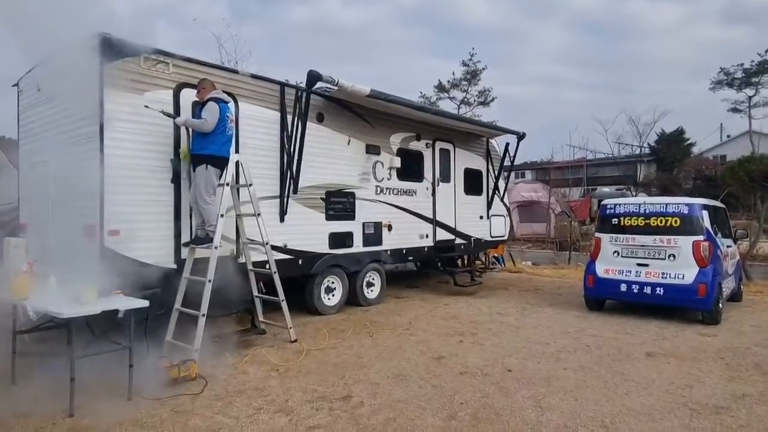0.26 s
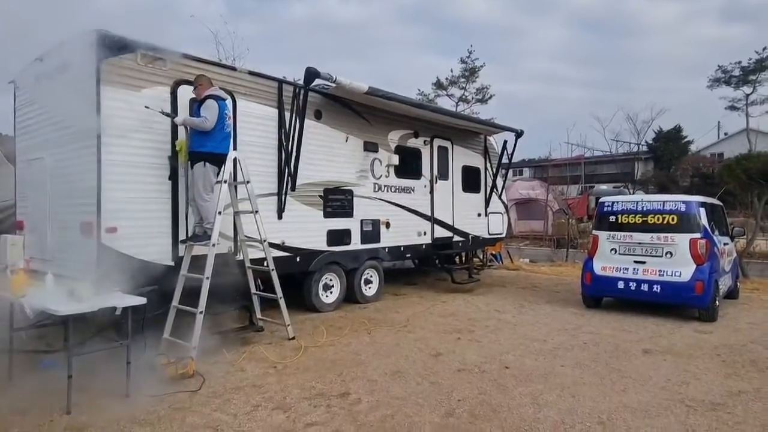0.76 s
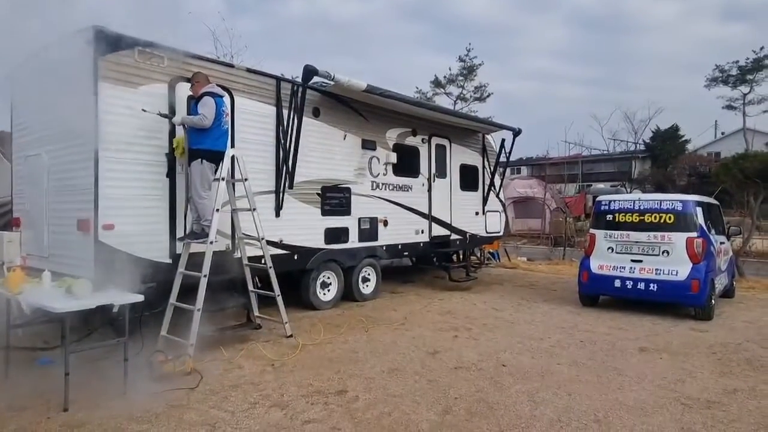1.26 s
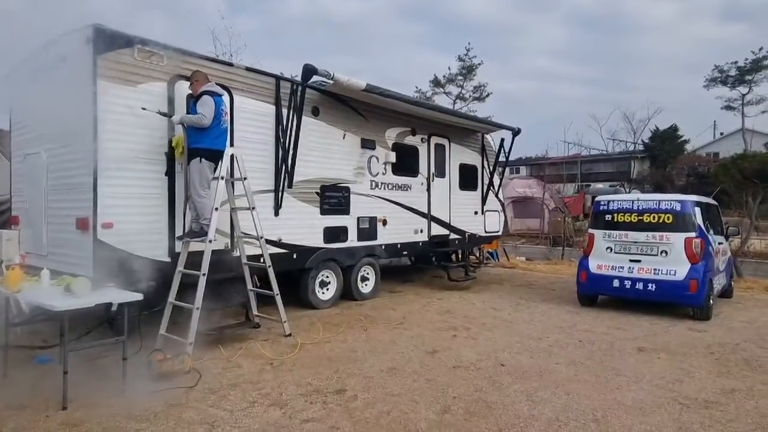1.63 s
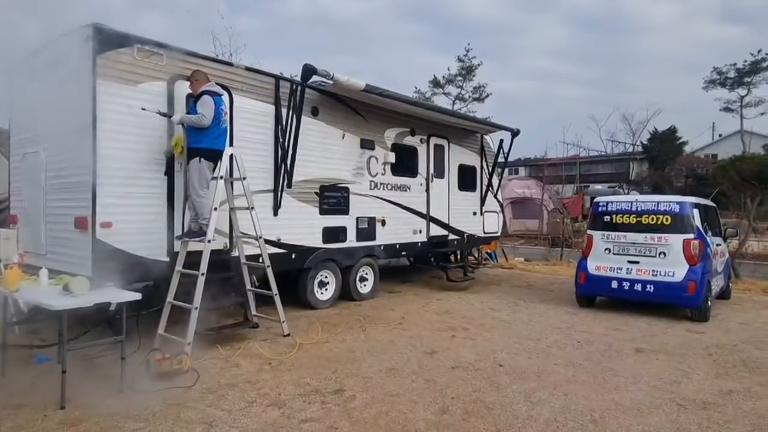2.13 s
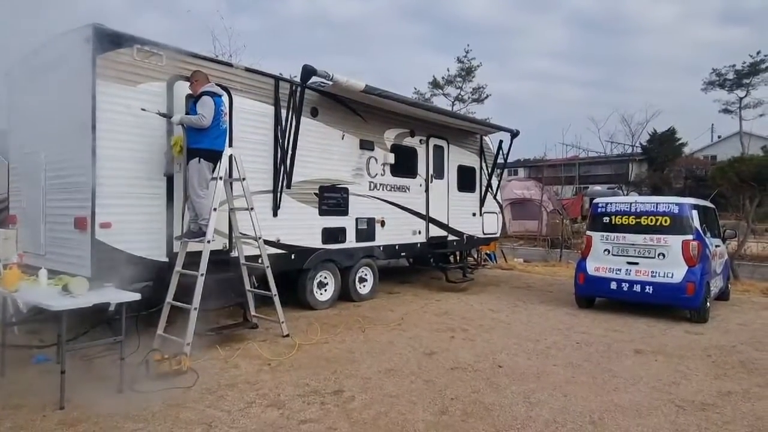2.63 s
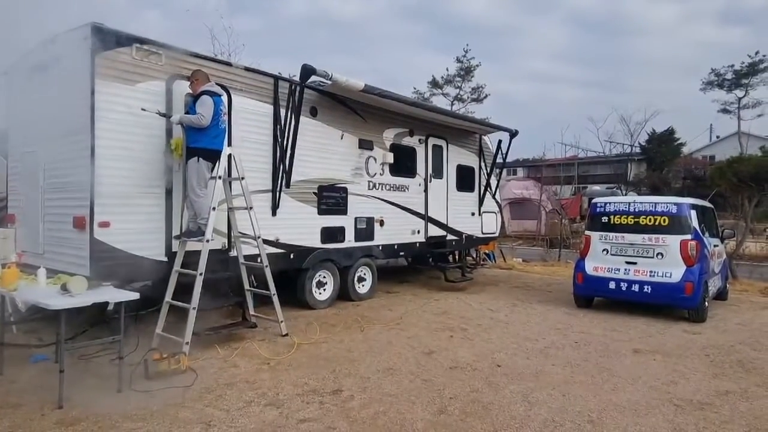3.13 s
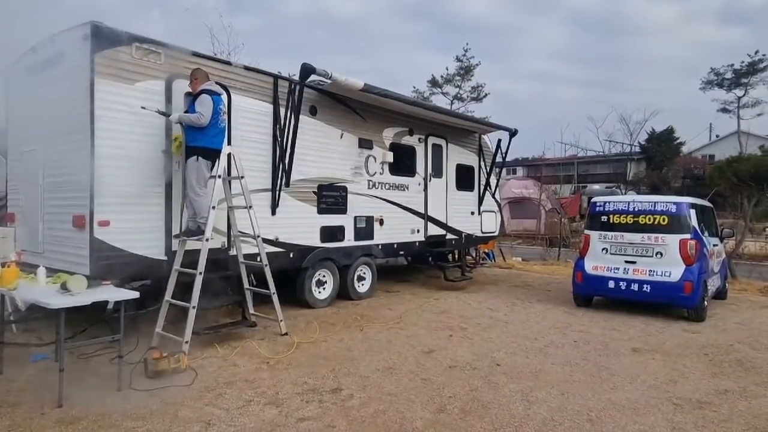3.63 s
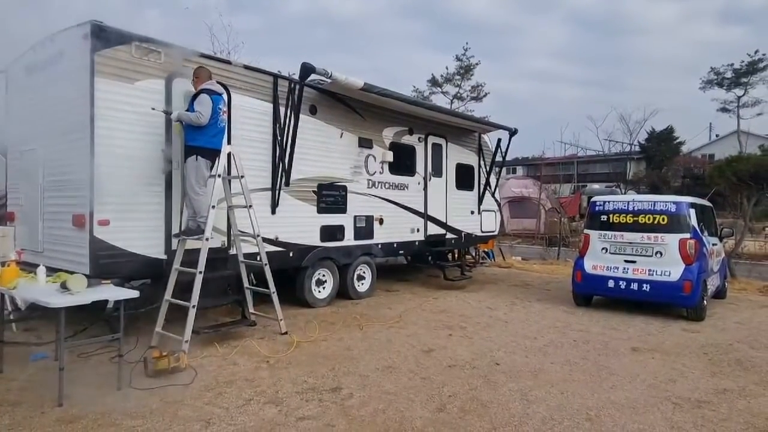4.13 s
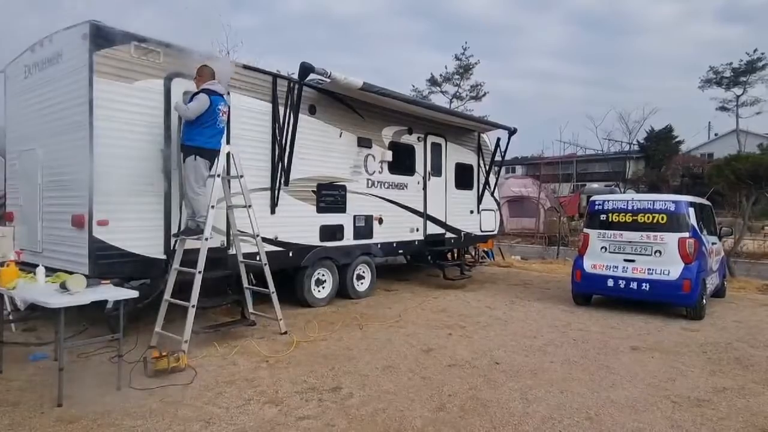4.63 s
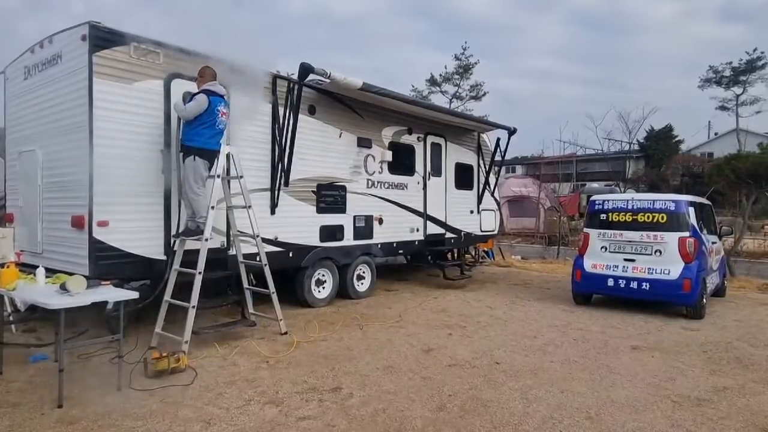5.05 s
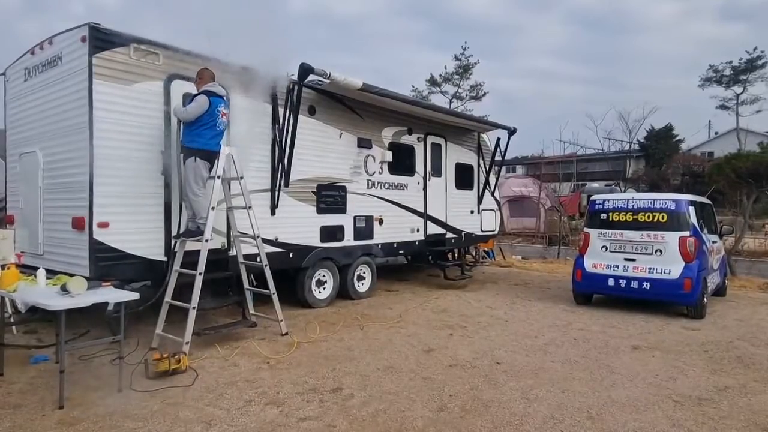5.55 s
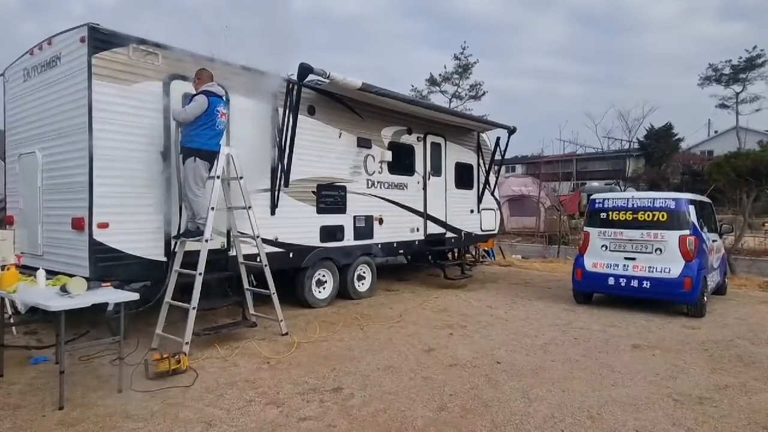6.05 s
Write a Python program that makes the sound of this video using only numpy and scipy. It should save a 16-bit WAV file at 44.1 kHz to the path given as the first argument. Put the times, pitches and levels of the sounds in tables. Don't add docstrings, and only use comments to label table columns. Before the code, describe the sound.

From 0 seconds a steam gun hisses continuously over a caravan wall in an open yard: dense, bright turbulent noise with slight flutter, a rougher low roar, faint whistles and short ground reflections. It dips around 0.5 s, rises by 1.1 s and stays strong until about 4.3 s. Very loud, dull, knock-like pops strike only the left microphone, crowded from 0.2 to 0.7 s, then scattered and clustered around 2.2-2.6 and 3-3.6 s; each momentarily ducks the left hiss. A soft spit comes at 3 s and a faint low wind thump near 3.65 s. The last two pops fall around 4.4 s, followed by a short high spit hard left at 4.5 s. The jet then turns away, several decibels quieter and more diffuse, swelling briefly at 5.3 s and slightly towards 6.3 s. Distant rumble and weak, wavering hum continue underneath.

```python
import sys
import numpy as np
from scipy import signal
from scipy.fft import rfft, irfft, next_fast_len
from scipy.io import wavfile
from scipy.ndimage import uniform_filter1d, map_coordinates

SR = 44100
rng = np.random.default_rng(int(sys.argv[2]) if len(sys.argv) > 2 else 0)


def inscribe(sig):
    pcm = np.round(np.clip(np.atleast_2d(sig).T, -1, 1) * 32767)
    wavfile.write(sys.argv[1], SR, pcm.astype(np.int16))


def elevation(decibels):
    levels = np.asarray(decibels, float)
    return 10 ** (levels / 20)


N = 276938
PADDED = next_fast_len(N)
HZ = np.maximum(np.arange(PADDED // 2 + 1) * SR / PADDED, 1)

# time_s, level_db
JET_LEVEL = [(0.0, -25), (0.09, -22), (0.31, -23), (0.52, -25.5), (1.1, -22), (1.33, -22), (2.2, -21.5),
             (2.57, -23), (3.24, -21), (3.57, -23), (4.3, -21.5), (4.46, -25), (4.53, -23.5), (4.59, -28.5),
             (4.66, -28.5), (4.74, -30), (5.08, -30.5), (5.26, -26.5), (5.36, -30.5), (5.47, -29),
             (5.6, -26.5)]
# time_s, share_0_to_1
FACING = [
    (0, 0.55),
    (1.2, 0.6),
    (1.4, 0.8),
    (4.03, 0.8),
    (4.12, 0.35),
    (4.5, 0.3),
    (4.6, 0.03),
    (6.28, 0.02),
]
# time_s, angle_degrees
AIM = [(0, 11), (1.05, 17), (1.3, 23), (4.05, 27.6), (4.33, 12), (4.5, 23), (5.04, 24), (5.3, 18),
       (6.28, 20)]
# pitch_hz, facing_db_per_hz, turned_away_db_per_hz
JET_COLOUR = [(250, -14, -21.5), (747, -14.5, -16.5), (780, -6.5, -11), (925, -11.5, -12.5),
              (1080, -9.5, -11), (1500, -8, -13), (2397, -9, -6.5), (2463, -2, -2.5), (2790, -3.5, 2),
              (3150, 2.7, 0.5), (4280, -2.3, -2.5), (5380, -0.5, 0), (7850, 2.5, 1.5), (8030, -1.6, -1),
              (9300, -1.5, 0.5), (10360, -3, -2), (11250, -1.5, -2), (12900, -3, -2.5), (13400, 0, 0),
              (15000, -3.5, -3.5)]
# pitch_hz, level_db
RIGHT_PORT = [(250, -1.5), (550, -5.5), (1000, -3), (1500, 1.5), (2300, 4.5), (2900, -2.5), (3600, -0.5),
              (4100, 0), (6000, -0.5), (7400, -5), (8600, 2), (9600, -6.5), (10300, -3.5), (11000, -1.5),
              (11700, -1.5), (12500, 6.5), (13300, 0)]
# pitch_hz, facing_0_to_1, turned_away_0_to_1
JET_LIKENESS = [(250, .3, .7), (800, .5, .75), (1050, .6, .65), (1180, .92, .72), (1480, .96, .85),
                (1650, .95, .85), (1820, .8, .88), (1980, .93, .85), (2150, .65, .78), (2400, .85, .2),
                (2550, .9, .4), (2700, .65, .7), (2850, .94, .8), (3000, .35, .1), (3300, .45, .05),
                (3480, .9, .45), (3650, .5, .2), (3900, .98, .55), (4150, .9, .1), (4450, .6, .55),
                (5050, .4, .1), (5200, .85, .15), (5350, .94, .15), (5550, .45, .2), (9500, .55, .2),
                (9950, .82, .1), (10300, .7, .1), (10700, .85, .1), (11000, .8, .2), (11300, .5, .2),
                (12500, .55, .3), (14000, .35, .2)]
# pitch_hz, width_hz, over_hiss_db
WHISTLES = [(3575, 60, 2.5), (4420, 120, 2.5), (7079, 70, 3), (8175, 90, 2.5), (12559, 90, 3),
            (15200, 300, 2.5)]
# pitch_hz, late_cycles
FACING_LAG = [(350, .27), (1000, .4), (1200, .485), (2100, .52), (2400, .97), (2700, 1.03), (2870, 1.45),
              (3450, 1.55), (3850, 2), (4500, 2.1), (5300, 2.5), (6700, 2.55), (8600, 3), (10200, 3.48),
              (10900, 3.52), (15500, 4.92)]
# pitch_hz, late_cycles
TURNED_LAG = [(150, .05), (600, .42), (1000, .37), (2000, .5), (3450, .5), (4000, .9), (4700, 1.07),
              (15500, 3.9)]
# left_late_ms, left_share, right_late_ms, right_share
NEAR_ECHOES = [(.71, .2, .8, .25), (1.7, .2, 1.04, .2), (2.61, .12, 2.84, .2), (5.8, .08, 1.37, .2),
               (2.1, .08, 2.1, .28)]
# time_s, left_late_ms, right_late_ms, strength_0_to_1
BOUNCE = [(0, 3.27, 3.3, .6), (.4, 3.25, 3.2, 1), (1.2, 3.12, 3.17, 1), (2.0, 3.08, 3.14, .7),
          (4, 3.05, 3.2, .6), (4.5, 3.1, 3.25, .75), (4.9, 3.1, 3.25, .4), (6.28, 3.1, 3.25, .3)]
BOUNCE_SHARES = [0.75, 0.67]
# pitch_hz, width_hz,
# lost_share
WEAK_REFLECTIONS = [(2850, 90, .7), (3470, 90, .6), (5300, 250, .85), (10600, 900, .9)]
# peak_s, pitch_hz, peak_db, half_length_s, left_minus_right_db
SPITS = [
    (4.52, 6740, -27, 0.0084, 20),
    (3, 2970, -35, 0.019, -4),
    (0.32, 4600, -50, 0.0059, -4),
]
# start_s, level_db, direction_sign
POPS = [(0.2098, -0.8, -1), (0.314, -2.6, 1), (0.3508, -0.6, -1), (0.3677, -0.8, 1), (0.406, -0.3, -1),
        (0.4433, -0.9, 1), (0.5176, -1.2, 1), (0.6588, 0.1, -1), (0.9765, -0.7, -1), (1.308, -0.5, -1),
        (1.5221, -1.1, 1), (1.9032, -0.4, -1), (2.2378, -0.8, -1), (2.3114, -0.3, 1), (2.3482, -1.1, 1),
        (2.3708, -1.2, 1), (2.5256, 0, 1), (2.5772, -0.9, -1), (2.6134, -1.6, 1), (2.9675, -2.0, 1),
        (3.0536, -1.2, 1), (3.3134, 0, 1), (3.43, -1.2, 1), (3.4718, -1.9, -1), (3.5408, -1.1, -1),
        (3.6133, -0.8, -1), (4.3932, -2.0, -1), (4.4339, -2.6, 1)]
# jump_s, later_ms, level_db, direction_sign
CLUSTER_JUMPS = [(0.2098, 6.0, -0.9, 1), (0.2098, 17.8, -6.8, 1), (0.314, 4.4, -1.8, 1), (0.314, 10.8, -1.4, 1),
                 (1.308, 17.9, -3.1, 1), (2.2378, 16.2, -2.9, 1), (3.4718, 11.7, -2.4, -1),
                 (3.5408, 4.5, -5.9, 1)]
# pitch_hz, level_db_per_hz
YARD_COLOUR = [(12, -57), (20, -33), (47, -22), (75, 1), (100, -0.5), (125, -16), (161, -9.5), (330, -20.5),
               (352, -13), (412, -30), (524, -17.5), (900, -25), (1170, -82), (1980, -120)]
# pitch_hz, likeness_0_to_1
YARD_LIKENESS = [(30, .2), (60, .5), (90, .76), (140, .55), (250, .25), (900, .2)]
# centre_s, peak_db, pitch_hz, half_length_s
GUSTS = [
    (3.657, -35, 30.2, 0.027),
]

LAST_SWELL_DB_PER_S = 1
TOP_LOSS_DB_PER_DEGREE = 0.3255
ROAR_DB, ROAR_FOLLOWS, USUAL_JET_DB = 1, 0.65, -22
LOW_PATCHINESS = 3
ECHO_S, ECHO_SHARE, ECHO_CUT_HZ = 0.003, 0.87, 2270
TURNED_ECHO_S, TURNED_ECHO_SHARE = 0.00385, 0.45
POP_DB, POP_DULL_HZ, LOW_CUT_HZ = 1.5, 2600, 315.0
SLIP_SHARE, SLIP_SPREAD = 0.24, 0.5
POP_EDGE = 0.35
DUCK_DB, DUCK_RECOVER_S, DUCK_AHEAD_S = -3.6, 0.014, 0.0028
YARD_DB, HUM_HZ, HUM_DB = -45, 59.6, -47.5
TOP_CUT_HZ = 15500


def steam():
    past_end_s = np.maximum(np.arange(N) / SR - JET_LEVEL[-1][0], 0)
    level_db = in_time(JET_LEVEL)[0] + LAST_SWELL_DB_PER_S * past_end_s
    top_db = -TOP_LOSS_DB_PER_DEGREE * in_time(AIM)[0]
    roar_db = ROAR_DB - (1 - ROAR_FOLLOWS) * (level_db - USUAL_JET_DB)
    facing = np.clip(in_time(FACING)[0], 0, 1)

    straight, turned = jet_paths()
    jet = np.sqrt(facing) * straight + np.sqrt(1 - facing) * turned
    jet = turbulence(jet, top_db - np.mean(top_db), roar_db, puff_db=0.35, patch_db=0.5, flutter_db=1.0)
    return jet * elevation(level_db + 6.5)


def jet_paths():
    colour_db, turned_db = in_pitch(JET_COLOUR)
    alike, turned_alike = in_pitch(JET_LIKENESS)
    whistle_db = sum(db / (1 + (2 * (HZ - hz) / width) ** 2) for hz, width, db in WHISTLES)
    low_cut = 1 / (1 + (200 / HZ) ** 4)
    ports = elevation(whistle_db + np.array([0 * HZ, in_pitch(RIGHT_PORT)[0]])) * low_cut

    echo_dulling = 1 / (1 + (HZ / ECHO_CUT_HZ) ** 4)
    echo = ECHO_SHARE * echo_dulling
    ground = (1 + echo * lag(ECHO_S * SR)) / np.sqrt(1 + echo ** 2)
    round_about = 1 + TURNED_ECHO_SHARE * echo_dulling * lag(TURNED_ECHO_S * SR)

    kept_share = np.prod([1 - lost * np.exp(-((HZ - hz) / width) ** 2) for hz, width, lost in WEAK_REFLECTIONS], axis=0)
    bright = kept_share / (1 + (2300 / HZ) ** 8)
    reflections = sum(np.array([left * lag(left_ms * SR / 1000), right * lag(right_ms * SR / 1000)])
                      for left_ms, left, right_ms, right in NEAR_ECHOES)
    even_out = np.sqrt(1 + 0.4 * bright)
    near = (1 + bright * reflections) / even_out

    straight = port_noise(elevation(colour_db) * ports * ground, alike, late_path(FACING_LAG), near, bright / even_out)
    turned = port_noise(elevation(turned_db) * ports * round_about, turned_alike, late_path(TURNED_LAG), bounce=bright)
    return straight, turned


def late_path(rows):
    return np.exp(-2j * np.pi * np.interp(HZ, *np.transpose(rows)))


def port_noise(gain, alike, path, echoes=1, bounce=0):
    shared, left, right = rfft(rng.standard_normal((3, PADDED)))
    alike = np.clip(alike, 0, 1)
    direct = np.sqrt(alike) * shared * [np.ones_like(path), path] * gain
    diffuse = np.sqrt(1 - alike) * np.array([left, right]) * gain
    out = irfft(direct * echoes + diffuse, PADDED)[:, :N]
    if np.any(bounce):
        *lags_ms, strength = in_time(BOUNCE)
        bounced = irfft((direct + diffuse) * bounce, PADDED)
        for side, late_ms in enumerate(lags_ms):
            wavering_ms = late_ms + 0.012 * drift(1.5)
            read_at = np.arange(N) - wavering_ms * SR / 1000
            moving = map_coordinates(bounced[side], [read_at], order=2, mode="grid-wrap")
            out[side] += BOUNCE_SHARES[side] * strength * moving
    return rms_one(out)


def turbulence(x, top_db, roar_db, puff_db, patch_db, flutter_db):
    spectrum, out = rfft(x, PADDED), 0
    place = np.clip(2.5 * np.log2(HZ / 500), 0, 12)
    puffs = drift(8.7) + 1.8 * drift(76)
    below = drift(8.6)
    for band in range(13):
        above = drift(2.9)
        centre_hz = 500 * 2 ** (band / 2.5)
        tilt_db = top_db * (centre_hz > 10000) + roar_db * (centre_hz < 1800)
        patchiness = LOW_PATCHINESS if centre_hz < 1400 else 1
        patches_db = patch_db * (below + above) * patchiness
        flutter = np.array([drift(28), drift(19)])
        gain_db = tilt_db + puff_db * puffs + patches_db + flutter_db * flutter
        out = out + elevation(gain_db) * irfft(spectrum * np.clip(1 - abs(place - band), 0, 1), PADDED)[:, :N]
        below = above
    return out


def spits():
    t, out = np.arange(N) / SR, 0
    for s, hz, db, half, pan_db in SPITS:
        band = signal.butter(2, [hz * 0.96, hz * 1.04], "band", fs=SR, output="sos")
        narrow = rms_one(signal.sosfilt(band, rng.standard_normal(N)))
        swell = np.exp(-((t - s) / half) ** 2)
        out = out + narrow * swell * elevation(db + pan_db * np.array([[0.5], [-0.5]]))
    return out


def pops():
    s, db, direction = all_jumps()
    jumps = np.zeros(N)
    jumps[np.round(s * SR).astype(int) - 6] = direction * elevation(db + POP_DB)
    step = np.cumsum(np.convolve(jumps, np.ones(4) / 4)[:N])

    slips = jumps.copy()
    slips[jumps != 0] *= 1 + SLIP_SPREAD * rng.uniform(-1, 1, np.count_nonzero(jumps))
    slip_shape = np.sqrt(np.sin(np.pi * np.clip(np.arange(-3, 46) / 46, 0, 1)))
    slip = np.convolve(slips, slip_shape)[:N]
    dull = signal.lfilter(*signal.butter(1, POP_DULL_HZ, fs=SR), step - SLIP_SHARE * slip)

    edges = np.cumsum(jumps * POP_EDGE * rng.random(N))
    edge_band = signal.butter(1, [1800, 4000], "band", fs=SR, output="sos")
    pop = dull + signal.sosfilt(edge_band, edges)
    return signal.sosfilt(signal.butter(5, LOW_CUT_HZ, "high", fs=SR, output="sos"), pop)


def ducking():
    s, db, _ = all_jumps()
    drops = np.zeros(N)
    drops[((s - DUCK_AHEAD_S) * SR).astype(int)] = elevation(db)
    depth = signal.lfilter([1], [1, -np.exp(-1 / (DUCK_RECOVER_S * SR))], drops)
    return elevation(DUCK_DB * uniform_filter1d(np.minimum(depth, 1), size=90))


def all_jumps():
    clustered = [(s + later_ms / 1000, db, direction) for s, later_ms, db, direction in CLUSTER_JUMPS]
    return np.transpose(list(POPS) + clustered)


def yard():
    return rumble() + boiler_hum() + wind()


def rumble():
    noise = port_noise(elevation(in_pitch(YARD_COLOUR)[0]), in_pitch(YARD_LIKENESS)[0], lag(3.5))
    return noise * elevation(YARD_DB + 2.0 + 3.7 * drift(6.3))


def boiler_hum():
    phase = 2 * np.pi * HUM_HZ * np.arange(N) / SR + 2.4 * drift(6.2)
    return elevation(HUM_DB + 5.0 + 1.6 * drift(24.0)) * np.sin(phase)


def wind():
    t = np.arange(N) / SR
    thump = sum(elevation(db) * np.exp(-((t - s) / half) ** 2) * np.sin(2 * np.pi * hz * (t - s))
                for s, db, hz, half in GUSTS)
    return thump * np.array([[1.35], [0.6]])


def rms_one(x):
    return x / np.sqrt(np.mean(x ** 2) + 1e-20)


def in_time(rows):
    s, *columns = np.transpose(rows)
    return [np.interp(np.arange(N) / SR, s, c) for c in columns]


def in_pitch(rows):
    hz, *columns = np.transpose(rows)
    return [np.interp(np.log(HZ), np.log(hz), c) for c in columns]


def drift(rate_hz):
    r = np.exp(-2 * np.pi * rate_hz * 40 / SR)
    noise = rng.standard_normal(N // 40 + 2002)
    slow = signal.lfilter([1], [1, -2 * r, r * r], noise)[2000:]
    return np.interp(np.arange(N) / 40, np.arange(len(slow)), rms_one(slow))


def lag(samples):
    return np.exp(-2j * np.pi * HZ * samples / SR)


def scene():
    left, right = steam() + spits() + yard()
    return np.array([left * ducking() + pops(), right])


def low_pass(x):
    return signal.sosfilt(signal.butter(12, 15700, fs=SR, output="sos"), x)


def record(dry):
    top_cut = signal.ellip(12, 0.3, 80, TOP_CUT_HZ, fs=SR, output="sos")
    mix = signal.sosfilt(top_cut, dry)
    return low_pass(mix)


dry = scene()
out = record(dry)
inscribe(out)
```